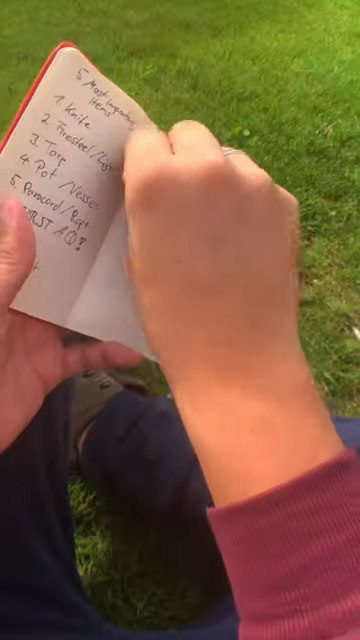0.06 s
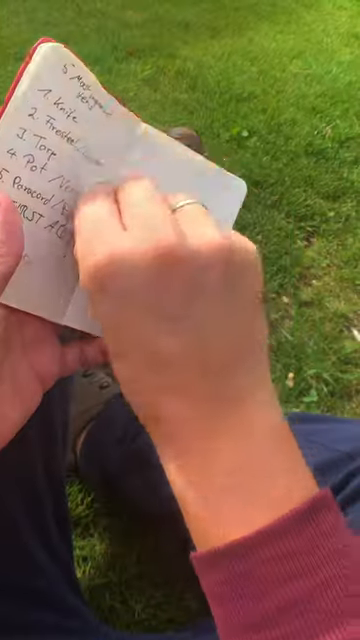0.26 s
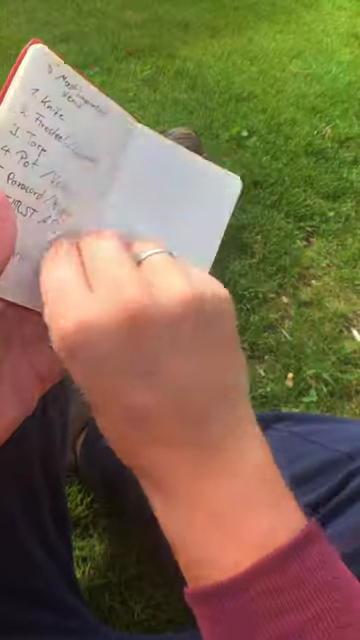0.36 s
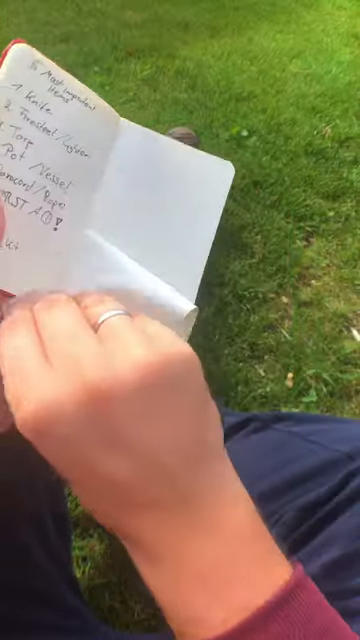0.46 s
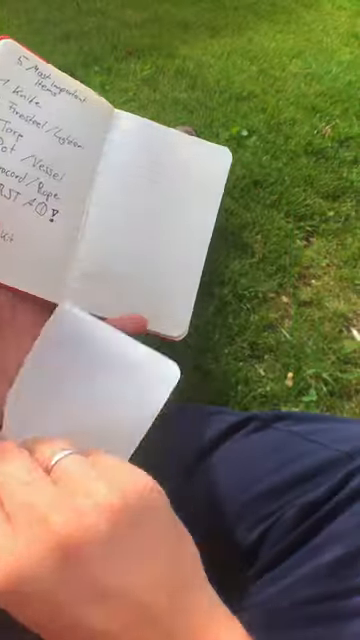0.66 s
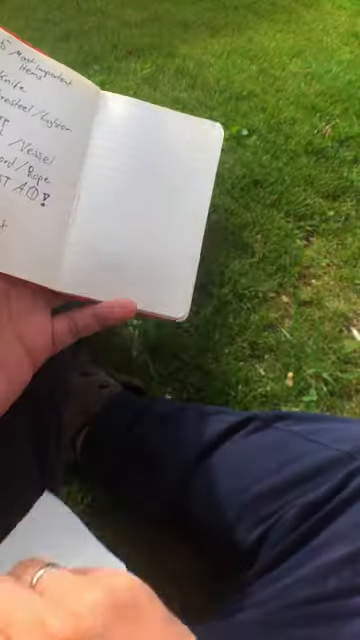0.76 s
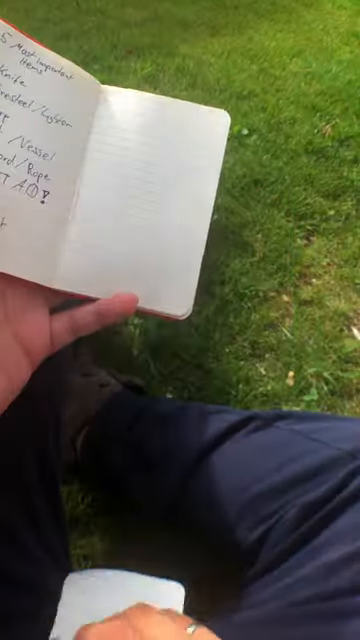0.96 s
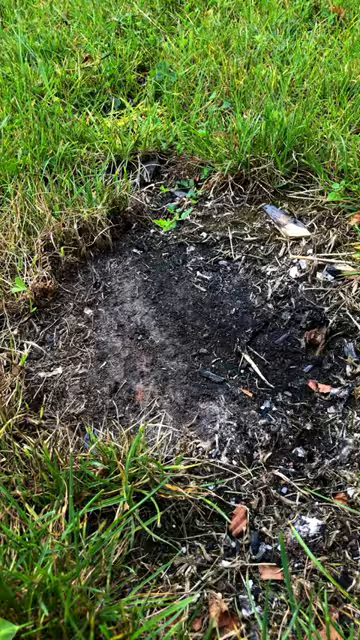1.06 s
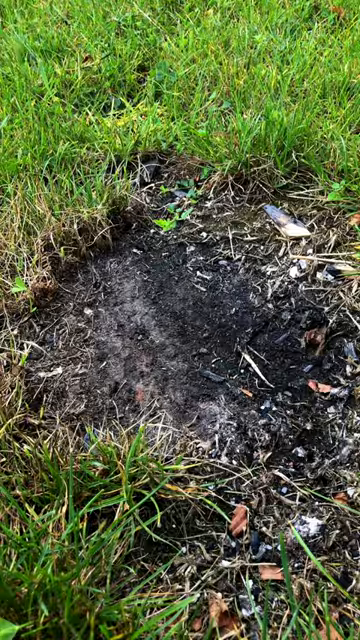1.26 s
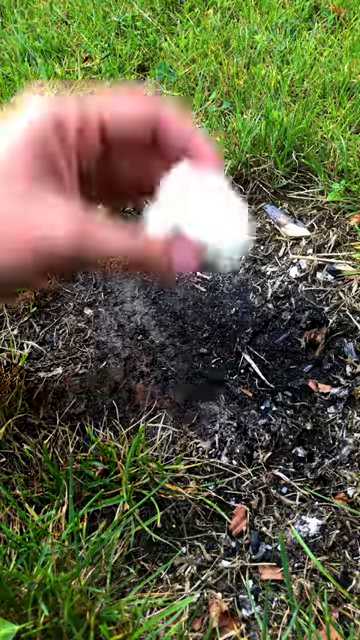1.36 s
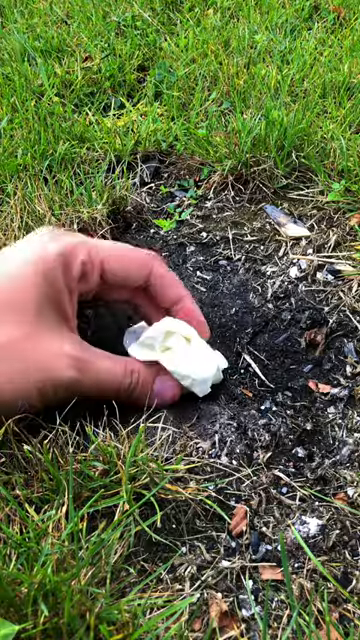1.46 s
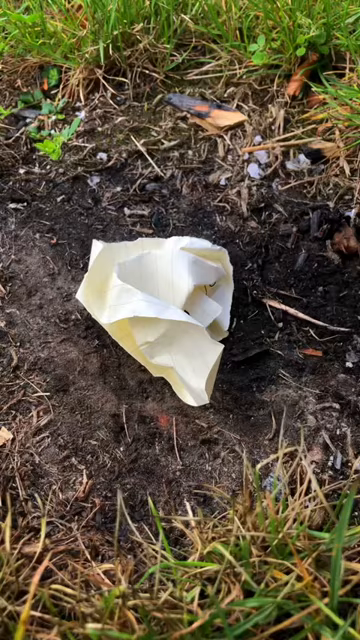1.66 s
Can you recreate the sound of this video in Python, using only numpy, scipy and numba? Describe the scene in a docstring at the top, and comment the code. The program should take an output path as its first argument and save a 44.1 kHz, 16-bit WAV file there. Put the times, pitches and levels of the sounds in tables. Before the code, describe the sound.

A notebook page is torn out up close, followed by a paper wad crackling on dry ground.

```python
"""Paper strains and starts to tear, outdoors and close to the microphone: a page is ripped out of a small
notebook. Snapping fibres grow louder; the freed sheet booms lower as it grows, lets go with a last jerk,
flaps and slides through the fingers. Then, abruptly, a crumpled paper ball is pressed onto dry, charred
ground, where it rustles, ticks and crackles. A faint distant rumble lies under both scenes."""
import sys
import numpy as np
from scipy import signal
from scipy.fft import rfft, irfft, next_fast_len
from scipy.io import wavfile
from scipy.ndimage import uniform_filter1d
from numba import njit

SR = 44100
rng = np.random.default_rng(int(sys.argv[2]) if len(sys.argv) > 2 else 0)


def master(y):
    """Save y as 16-bit WAV."""
    cut = np.clip(np.atleast_2d(y).T, -1, 1)
    pcm = np.round(cut * 32767)  # scale
    wavfile.write(sys.argv[1], SR, pcm.astype(np.int16))


N = 74970
T = np.arange(N) / SR
CHANGE_S = 1.076  # the notebook gives way to the paper ball
SNAPS_PER_S, TOP_HZ = 9000, 15750

# spectrum of the sheet hanging free (frequency [Hz], relative level [dB])
FREE_SHEET_COLOUR = [(300, -21), (800, -16), (1150, -2), (1500, -3.5), (2100, 1), (2800, 0.5), (3400, -5),
                     (4100, -29.5), (6000, -37)]
# spectrum of paper straining or sliding (frequency [Hz], relative level [dB])
HISS_COLOUR = [(3500, -46), (4500, -25), (6000, -13.5), (7500, -13.5), (9000, -9.5), (10400, -6),
               (11200, 1.5), (12000, 0), (13000, -10), (14300, -21), (15600, -24)]
# spectrum of a buckling crease (frequency [Hz], relative level [dB])
CREASE_COLOUR = [(200, -5.5), (600, -5), (1500, 1.5), (2400, -4), (3300, 3), (4800, -1), (6500, -3),
                 (9000, -3), (12000, -8.5), (15500, -12)]


def amp(db):
    """Decibels to gain."""
    return 10 ** (np.asarray(db) / 20)


def unit(x):
    """Scale to rms 1."""
    return x / np.sqrt(np.mean(x ** 2) + 1e-20)


def curve(table, column=1):
    """One column of a table, joined by straight lines in time."""
    rows = np.array(table)
    return np.interp(T, rows[:, 0], rows[:, column])


def colour(x, points):
    """Causal filter through (Hz, dB) points; rms 1 out."""
    size = next_fast_len(2 * N)
    hz, db = np.array(points).T
    bins_hz = np.maximum(np.fft.rfftfreq(size, 1 / SR), 1)
    gain = amp(np.interp(np.log(bins_hz), np.log(hz), db))
    cepstrum = irfft(np.log(gain), size)
    cepstrum[1:size // 2] *= 2  # made one-sided for minimum phase
    cepstrum[size // 2 + 1:] = 0
    return unit(irfft(rfft(x, size) * np.exp(rfft(cepstrum)), size)[:N])


@njit
def bandpass(x, hz, width):
    """State-variable band-pass whose centre and width may move."""
    y, band, low = np.empty(len(x)), 0., 0.
    for i in range(len(x)):
        g, damping = np.tan(np.pi * hz[i] / SR), width[i] / hz[i]
        v = (band + g * (x[i] - low)) / (1 + g * (g + damping))
        band, low = 2 * v - band, low + 2 * g * v
        y[i] = damping * v
    return y


def resonance(x, hz, width_hz):
    """One steep resonance, steady or moving: two band-passes in a row."""
    hz, width_hz = hz * np.ones(N), width_hz * np.ones(N)
    return bandpass(bandpass(x, hz, width_hz), hz, width_hz)


def walk(rate):
    """Smooth random wander with rms 1."""
    span = max(int(SR / rate), 2)
    return unit(uniform_filter1d(uniform_filter1d(rng.standard_normal(N), span), span))


def snaps(rate, scatter_db):
    """Tiny clicks at random moments, of scattered size."""
    hit = rng.random(N) < rate / SR
    size = amp(scatter_db * np.clip(rng.standard_normal(N), -2, 2))
    return unit(hit * size * np.sign(rng.standard_normal(N)))


def burst(sound, envelope):
    """Cut a piece out of a steady sound, with rms 1 where the envelope is 1."""
    piece = sound * envelope
    return piece * np.sqrt(np.sum(envelope ** 2) / (np.sum(piece ** 2) + 1e-20))


def jerk(start, length, attack_s=.0015, release_s=.0021):
    """Envelope that rises quickly, holds for its length and dies away."""
    age = T - start
    return np.clip(age / attack_s, 0, 1) * np.exp(-np.maximum(age - length, 0) / release_s)


def crossfade(before, after, centre_s, over_s):
    """Blend linearly from one sound to another."""
    share = np.clip((T - centre_s) / over_s + .5, 0, 1)
    return before * (1 - share) + after * share


def outdoors(fade_in_s=.026):
    """Faint rumble far from the microphone, a little stronger by the burnt ground."""
    # background around the notebook (frequency [Hz], relative level [dB])
    air_colour = [(20, -28), (40, -3), (66, 4.5), (100, -1), (150, -2.5), (220, -5.5), (330, -7.5),
                  (480, -14.5), (1000, -19.5), (3000, -39), (8000, -33.5), (15000, -54)]
    # background by the burnt ground (frequency [Hz], relative level [dB])
    rumble_colour = [(20, -30), (40, -11), (66, 5), (100, -5.5), (145, -0.5), (220, -9.5), (340, -6),
                     (450, -19.5), (1000, -23.5), (3000, -31.5), (8000, -39), (15000, -43)]
    air = amp(-56.5 + .46 * walk(15)) * colour(rng.standard_normal(N), air_colour)
    rumble = amp(-55.5) * colour(rng.standard_normal(N), rumble_colour)
    return air * (T < CHANGE_S) + rumble * np.clip((T - CHANGE_S) / fade_in_s, 0, 1)


def knocks(attack_s=.001):
    """Hands bump the notebook, which answers with damped low thuds."""
    # soft knocks (time [s], frequency [Hz], decay [s], level [dB])
    thuds = [(.002, 149.6, 0.016, -41), (0.02, 170, 0.0046, -36.5), (0.077, 64.3, 0.014, -34.5),
             (.18, 77.4, .015, -51), (0.281, 210, 0.013, -42), (0.602, 133, 0.015, -35),
             (.735, 79, 0.014, -42.5), (.795, 99, 0.022, -50)]
    out = np.zeros(N)
    for start, hz, decay, db in thuds:
        age = np.maximum(T - start, 0)
        envelope = np.exp(-age / decay) * (1 - np.exp(-age / attack_s))
        out += amp(db) * np.sin(2 * np.pi * hz * age) * envelope
    return out


def ticks(start_hz=1550, end_hz=295, fall_s=.00165, rise_s=.0012, click_s=.0009):
    """Small folds pop; treble bending waves arrive first, so each pop clicks and falls in pitch."""
    # pops in the paper ball (time [s], level [dB])
    pops = [(1.2082, -43), (1.218, -45), (1.2582, -44), (1.3084, -43), (1.395, -43), (1.4393, -45.5),
            (1.481, -52)]
    out = np.zeros(N)
    click = colour(rng.standard_normal(N), CREASE_COLOUR)
    detunes = np.exp(.12 * rng.standard_normal(len(pops)))  # shift each sweep up or down
    for (start, db), detune in zip(pops, detunes):
        age = np.maximum(T - start, 0)
        turns = end_hz * age + (start_hz - end_hz) * fall_s * (1 - np.exp(-age / fall_s))
        envelope = age / rise_s * np.exp(1 - age / rise_s)
        out += amp(db) * np.sin(2 * np.pi * turns * detune) * envelope
        out += amp(db - 4) * burst(click, np.exp(-abs(T - start - rise_s) / click_s))
    return out


def paper_ball():
    """The ball scrapes on cinders; buckling creases let off showers of clicks that ring its folds."""
    # spectrum of paper rubbing on the ground (frequency [Hz], relative level [dB])
    scuff_colour = [(200, -11), (600, -13.5), (1300, -6), (2400, -1.5), (3500, 0.5), (4800, -0.5),
                    (6500, -4.5), (9000, -5.5), (12000, -12), (15500, -14)]
    # course of the rubbing (time [s], level [dB])
    rustle_levels = [(1.08, -64.5), (1.14, -61), (1.195, -54), (1.245, -66.5), (1.29, -58), (1.33, -47.5),
                     (1.357, -55.5), (1.38, -49), (1.4, -60), (1.425, -57), (1.46, -53), (1.49, -62),
                     (1.54, -51), (1.585, -70.5), (1.61, -50), (1.622, -70), (1.64, -54), (1.675, -77),
                     (1.7, -57)]
    # resonances of the ball (frequency [Hz], width [Hz], gain [dB])
    ball_modes = [(1670, 590, -1.5), (3350, 650, 2.5), (4730, 1400, 2), (6120, 750, 2), (8730, 710, 2),
                  (9600, 1700, -5.5), (12100, 560, -9), (15000, 800, -12)]
    # creases buckling (peak time [s], rise [s], decay [s], level [dB], ringing share [0-1])
    crackles = [(1.3457, 0.003, 0.00061, -22.5, 0.97), (1.4114, 0.004, 0.0096, -32, 0),
                (1.4533, 0.00031, 0.0018, -31.5, 0.2), (1.468, 0.00047, .003, -45, 0.03),
                (1.6275, 0.00049, 0.0012, -38.5, 0.15), (1.688, 0.00046, 0.0024, -43, 0)]
    grit = snaps(9000, scatter_db=3.5) * amp(1.4 * walk(200))
    out = colour(grit, scuff_colour) * amp(curve(rustle_levels))
    clicks = snaps(12000, scatter_db=2.5)
    crunch = colour(clicks, CREASE_COLOUR)
    ring = unit(sum(amp(db) * resonance(clicks, hz, width) for hz, width, db in ball_modes))
    for peak, rise, decay, db, share in crackles:
        envelope = np.exp(-np.maximum((peak - T) / rise, (T - peak) / decay))
        out += amp(db) * burst(np.sqrt(share) * ring + np.sqrt(1 - share) * crunch, envelope)
    return out


def loose_page():
    """The freed page flicks straight, ringing briefly, and slides through the fingers."""
    # spectrum of a flap (frequency [Hz], relative level [dB])
    flap_colour = [(100, -8), (300, -13), (800, -11), (1300, -4), (1640, 0.5), (2150, 2.5), (2550, 9),
                   (3000, -13.5), (4000, -29), (8000, -37), (15000, -57)]
    # flaps of the page (time [s], length [s], level [dB])
    flicks = [(0.702, 0.0068, -35), (0.712, 0.0057, -31.5), (0.725, 0.018, -62), (0.747, .013, -44.5),
              (1.04, 0.0047, -48)]
    # paper sliding on skin (time [s], hiss level [dB], rasp level [dB])
    slide_levels = [(.69, -84, -59), (.705, -67, -60), (.72, -46.5, -51), (.738, -57.5, -46.5),
                    (.758, -53, -52.5), (.785, -61, -56.5), (.83, -61, -57), (.9, -52, -54),
                    (.96, -60.5, -61), (1.01, -56, -57), (1.07, -53.5, -57.5)]
    clicks = snaps(5000, scatter_db=5)
    ring = unit(resonance(clicks, hz=2510, width_hz=330))
    flap = unit(colour(clicks, flap_colour) + amp(.5) * ring)
    flaps = sum(amp(db) * burst(flap, jerk(start, length)) for start, length, db in flicks)
    rub = rng.standard_normal(N) * amp(1.3 * walk(150))
    hiss = colour(rub, HISS_COLOUR) * amp(curve(slide_levels, 1))
    rasp = colour(rub, FREE_SHEET_COLOUR) * amp(curve(slide_levels, 2))
    return flaps + hiss + rasp


def near_echoes(x, decay_s=.0062, ring_db=-4.5):
    """Every click echoes briefly off the notebook and the hand, for a few milliseconds."""
    age = T[:SR // 40]
    tail = rng.standard_normal(len(age)) * np.exp(-age / decay_s)
    return unit(x + amp(ring_db) * signal.fftconvolve(x, tail / np.linalg.norm(tail))[:N])


def flexing(x, depth_db, rate, bands=26):
    """Paper keeps changing shape, so narrow bands swell and fade each on their own."""
    size = next_fast_len(N)
    spectrum, out = rfft(x, size), np.zeros(N)
    band_index = (bands - 1) * np.sqrt(np.minimum(np.fft.rfftfreq(size, 1 / SR) / TOP_HZ, 1))
    for k in range(bands):
        band = irfft(spectrum * np.maximum(1 - abs(band_index - k), 0), size)[:N]
        out += band * amp(depth_db * walk(rate))
    return unit(out)


def sheet_rasp(drive):
    """The sheet sounds hollow while it is held taut, broader once it hangs free."""
    # spectrum of the taut sheet (frequency [Hz], relative level [dB])
    taut_colour = [(300, -17.5), (750, -26.5), (1100, -12), (1500, 0), (1850, -5), (2400, -0.5),
                   (2900, -2.5), (3300, -16), (4100, -35), (6000, -41)]
    taut, free = colour(drive, taut_colour), colour(drive, FREE_SHEET_COLOUR)
    return crossfade(taut, free, centre_s=.394, over_s=.024)


def fibre_hiss(drive):
    """A thin hiss while the page only strains, fuller once the tear bites."""
    # spectrum of snapping fibres (frequency [Hz], relative level [dB])
    fibre_colour = [(3500, -35), (4500, -22), (5500, -14.5), (7500, -8.5), (9000, -6.5), (10500, -2),
                    (11700, 3), (12800, -2), (14300, -18), (15600, -11.5)]
    straining, tearing = colour(drive, HISS_COLOUR), colour(drive, fibre_colour)
    return crossfade(straining, tearing, centre_s=.29, over_s=.1)


def binding_scrape(drag):
    """A narrow scraping resonance rises as the tear runs along the binding."""
    # course of the scrape (time [s], frequency [Hz], level [dB])
    path = [(0, 2780, -71), (.11, 2940, -53), (.19, 3080, -51.5), (.24, 3040, -47.5), (.32, 3270, -77),
            (.41, 3370, -44.5), (.5, 3070, -50), (.6, 3220, -74), (.647, 3470, -30), (.67, 3540, -59),
            (.7, 3700, -74)]
    return unit(resonance(drag, curve(path, 1), width_hz=550)) * amp(curve(path, 2))


def sheet_boom(drag, clumps):
    """The sheet's lowest resonance sinks as more of it comes free, amid a broad low wash."""
    # lowest resonance of the freed sheet (time [s], frequency [Hz])
    boom_pitch = [(.3, 905), (.41, 560), (.51, 466), (.545, 236), (.62, 226)]
    # broad spectrum around the boom (frequency [Hz], relative level [dB])
    wash_colour = [(50, -28), (140, -8.5), (600, 0), (1100, -4), (2000, -19), (5000, -50)]
    hz = curve(boom_pitch)
    mode = unit(resonance(drag, hz, width_hz=.55 * hz) / np.sqrt(hz))  # even power as the band narrows
    wash = colour(snaps(SNAPS_PER_S, scatter_db=1.5) * clumps, wash_colour)
    return amp(-5) * (mode + wash)


def catches():
    """Tough spots in the binding hold, then a bundle of fibres goes at once."""
    # spots giving way (time [s], length [s], fibre level [dB], rasp level [dB])
    tough_spots = [(0.0158, 0.0013, -46, -50), (0.061, .003, -48, -56), (0.0787, 0.0022, -41.5, -67),
                   (0.086, 0.0014, -48, -68), (.1185, 0.0017, -50, -50), (0.1843, 0.0015, -41, -49),
                   (0.217, 0.0021, -39, -46), (0.2248, 0.0016, -34, -51), (.2328, .004, -36, -44.5),
                   (0.246, .006, -48.5, -52), (0.295, 0.0053, -34, -32.5), (0.3136, 0.0057, -34.5, -29),
                   (0.36, 0.0065, -48, -37), (0.391, 0.004, -39, -40), (0.4312, 0.0035, -26.5, -40.5),
                   (0.44, 0.0066, -35, -46), (0.4521, 0.0036, -29, -33.5), (0.5196, 0.0045, -35, -33.5),
                   (0.573, 0.0019, -34, -54), (0.598, 0.019, -40, -36.5), (0.628, 0.0038, -35, -36),
                   (0.643, 0.003, -23, -34), (0.6541, 0.0019, -23.5, -24.5)]
    drive = near_echoes(snaps(SNAPS_PER_S, scatter_db=2.5))
    fibres, rasp = fibre_hiss(drive), sheet_rasp(drive)
    out = np.zeros(N)
    for start, length, fibre_db, rasp_db in tough_spots:
        envelope = jerk(start, length)
        out += amp(fibre_db) * burst(fibres, envelope) + amp(rasp_db) * burst(rasp, envelope)
    return out


def rip():
    """Close to the microphone, fibres snap in clumps; the sheet radiates them as rasp, scrape and boom."""
    # course of the tear (time [s], fibre level [dB], rasp level [dB], boom gain [dB])
    levels = [(0, -58, -67.5, -71), (.055, -59.5, -62.5, -75), (.12, -50.5, -59, -83), (.21, -46, -54, -64),
              (.27, -41, -43.5, -73), (.31, -41.5, -45, -83), (.33, -38.5, -36.5, -64),
              (.375, -38, -40, -52.5), (.405, -38, -45, -51), (.429, -36.5, -45, -42.5),
              (.46, -35, -37.5, -48), (.5, -31, -37, -41.5), (.55, -32.5, -37.5, -43.5),
              (.595, -30, -42.5, -39.5), (.625, -34, -37, -39.5), (.655, -32, -29, -40.5),
              (.68, -42.5, -40, -42.5), (.692, -59, -52, -63), (.71, -70, -90, -64)]
    clumps = amp(1.62 * walk(340) + .5 * walk(70))
    breaks = near_echoes(snaps(SNAPS_PER_S, scatter_db=5.5))
    breaks = flexing(breaks, depth_db=2.5, rate=34) * unit(clumps)
    fibres = fibre_hiss(breaks) * amp(curve(levels, 1))
    bends = near_echoes(snaps(SNAPS_PER_S, scatter_db=4.5) * clumps * amp(walk(190)))
    rasp = sheet_rasp(bends) * amp(curve(levels, 2))
    drag = snaps(SNAPS_PER_S, scatter_db=2) * clumps
    boom = sheet_boom(drag, clumps) * amp(curve(levels, 3))
    return fibres + rasp + binding_scrape(drag) + boom


def scene():
    """The notebook first, then a sudden change to the paper ball on the burnt ground."""
    notebook = rip() + catches() + loose_page() + knocks()
    ball = paper_ball() + ticks()
    changed = np.clip((T - CHANGE_S) / .0011, 0, 1)
    return (notebook * (1 - changed) + ball * changed + outdoors())[None]


def record(dry):
    """One microphone, into a recorder that cuts the deepest bass and the top."""
    low_cut = signal.butter(4, 36, "high", fs=SR, output="sos")
    high_cut = signal.ellip(14, .2, 80, TOP_HZ, fs=SR, output="sos")
    return signal.sosfilt(high_cut, signal.sosfilt(low_cut, dry))


dry = scene()
out = record(dry)
master(out)
```